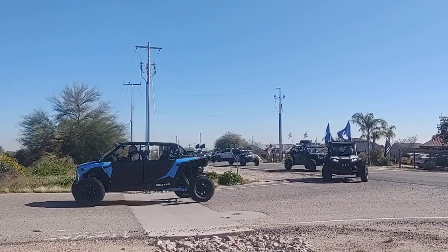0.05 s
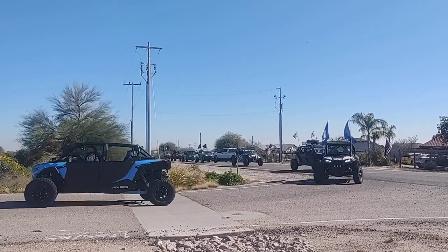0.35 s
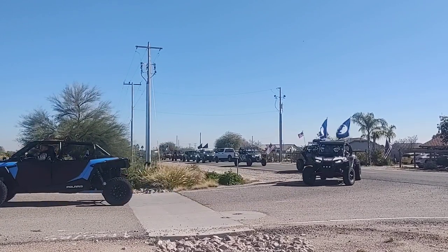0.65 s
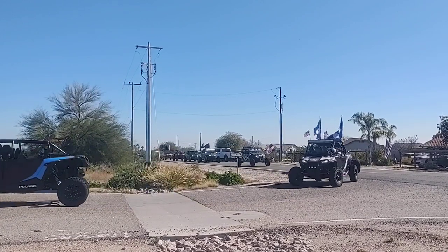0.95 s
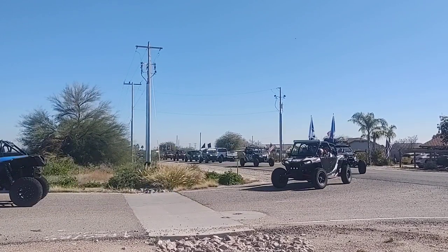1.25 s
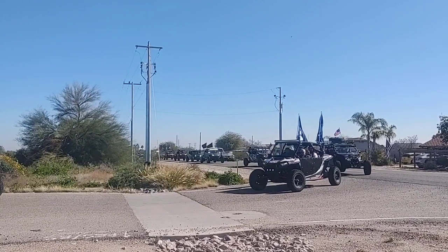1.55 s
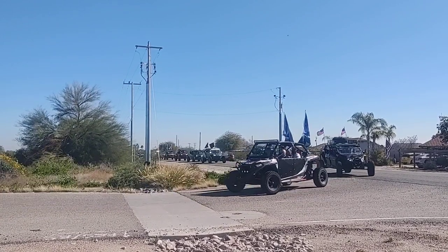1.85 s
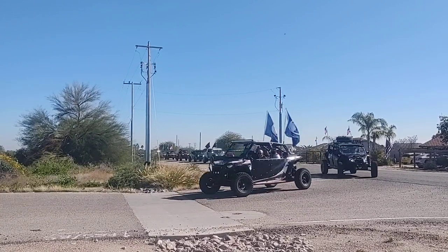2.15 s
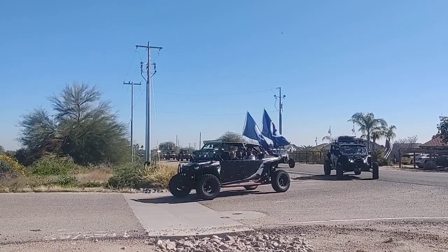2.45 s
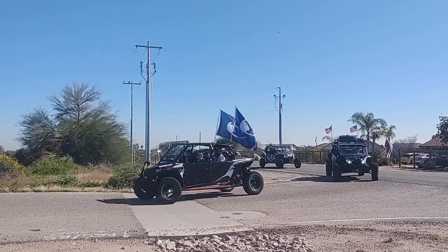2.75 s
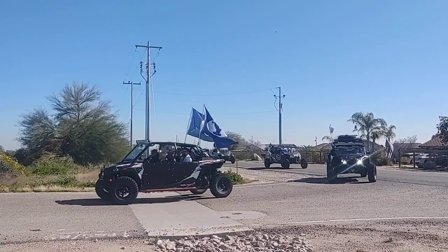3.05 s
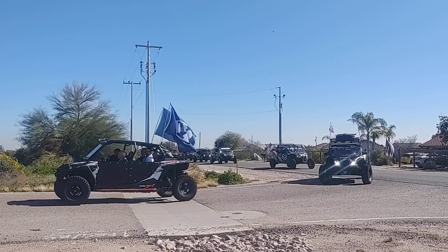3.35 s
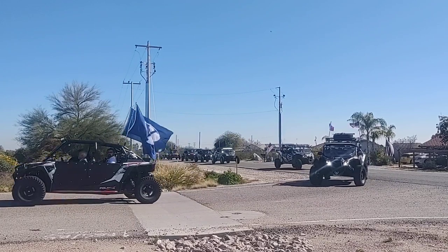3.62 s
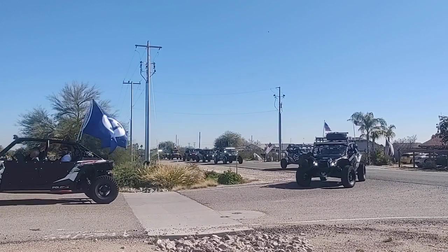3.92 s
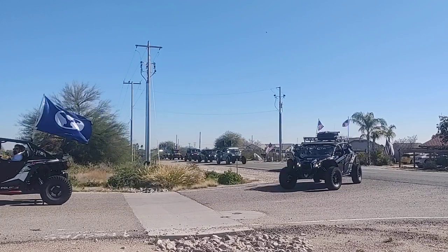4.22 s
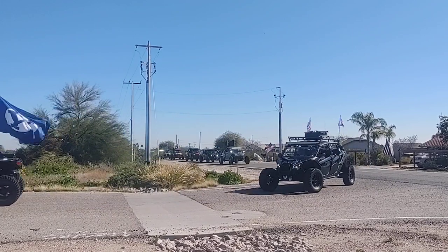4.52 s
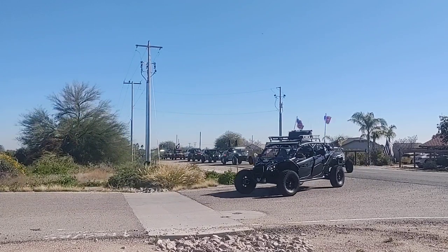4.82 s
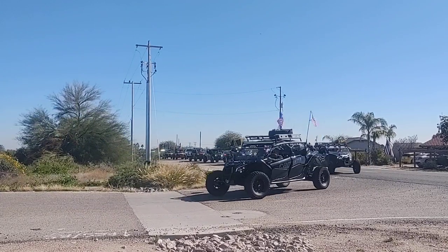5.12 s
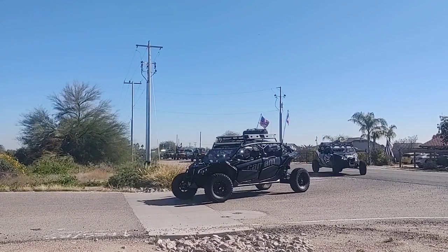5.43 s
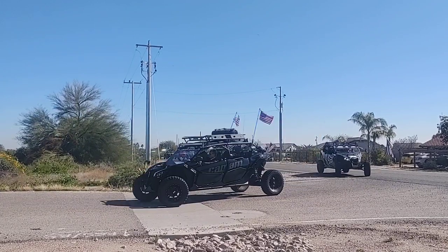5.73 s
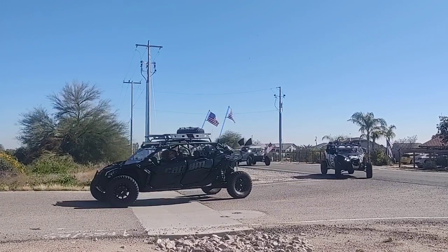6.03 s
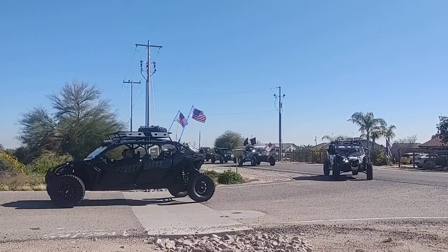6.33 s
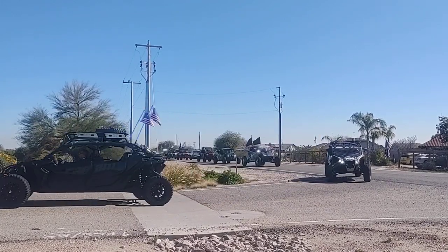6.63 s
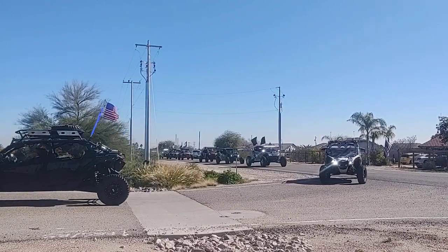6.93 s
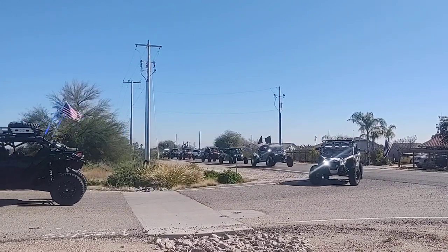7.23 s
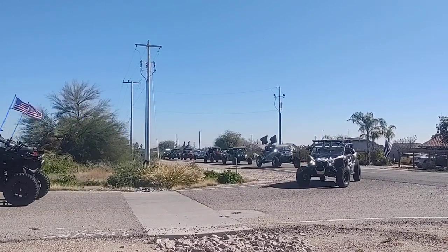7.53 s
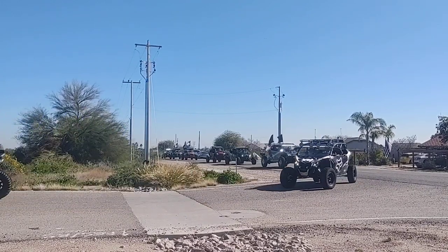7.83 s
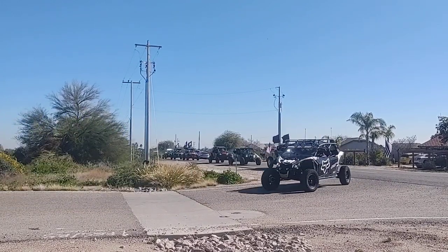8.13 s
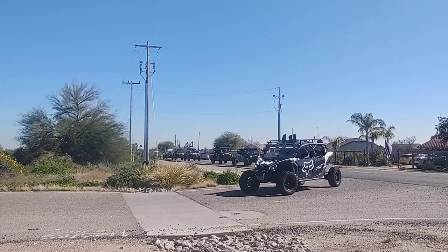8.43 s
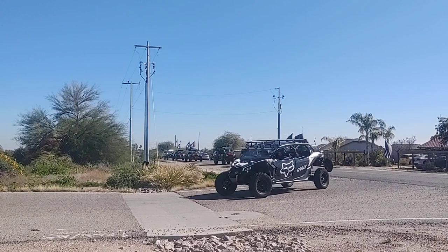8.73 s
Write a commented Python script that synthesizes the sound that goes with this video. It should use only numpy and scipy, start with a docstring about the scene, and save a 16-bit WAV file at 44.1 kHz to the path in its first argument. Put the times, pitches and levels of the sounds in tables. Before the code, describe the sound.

A line of off-road buggies crawls past on a street in the open air. Their uneven exhausts drone and beat against each other close by, over the low rumble of waiting engines. Tyres hiss and crunch on grit as each one passes, with light mechanical clatter. One engine blips midway; later a suspension squeaks twice and a buggy revs up from a muffled note into a snarl.

```python
"""Uneven twin-cylinder exhausts drone and beat as a column of off-road buggies crawls along a street.
Each firing rings a silencer; one buggy revs up and its muffled note opens into a snarl.
Intakes throb, drive belts whistle, valve gear clatters, tyres hiss and crunch on grit,
and a dry suspension bush squeaks twice. Behind it all rumbles the waiting queue, in the open air."""
import sys
import numpy as np
from scipy import signal
from scipy.fft import rfft, irfft, next_fast_len
from scipy.io import wavfile
from scipy.ndimage import uniform_filter1d

SR = 44100
rng = np.random.default_rng(int(sys.argv[2]) if len(sys.argv) > 2 else 0)


def dump(signal):
    """Clip the signal to [-1, 1] and save it as 16-bit WAV at the path in sys.argv[1]."""
    limited = np.clip(np.atleast_2d(signal).T, -1, 1)
    pcm = np.round(limited * 32767).astype(np.int16)
    wavfile.write(sys.argv[1], SR, pcm)


N = 395577
TIME = np.arange(N) / SR


def undb(db):
    """Decibels to gain."""
    return 10 ** (np.asarray(db) / 20)


def unit(x):
    """Scale to rms 1."""
    return x / np.sqrt(np.mean(x ** 2))


def curve(table):
    """A (time_s, value) automation lane, sample by sample."""
    return np.interp(TIME, *np.transpose(table))


def around(s, reach_s):
    """The samples near a moment."""
    return slice(max(int((s - reach_s) * SR), 0), int((s + reach_s) * SR))


def swell(s, half_s, steepness=2):
    """Rises to 1 at a moment and falls away again."""
    return np.exp(-np.minimum(np.abs((TIME - s) / half_s), 5) ** steepness)


def throttle(opens_s, attack_s, hold_s, release_s):
    """The pedal is pressed, held and let go."""
    return np.interp(TIME, opens_s + np.cumsum([0, attack_s, hold_s, release_s]), (0, 1, 1, 0))


def wander(rate_hz):
    """Smooth random modulation with a spread near 1."""
    steps = rng.standard_normal(2048)
    place = TIME * rate_hz
    k = place.astype(int)
    blend = .5 - .5 * np.cos(np.pi * (place - k))
    return steps[k % 2048] * (1 - blend) + steps[(k + 1) % 2048] * blend


def colour(x, points, size=4096):
    """Minimum-phase EQ through (freq_hz, gain_db) points, rolling off above the last."""
    hz, db = np.transpose(points)
    log_hz = np.log(np.maximum(hz, 1))
    grid = np.log(np.maximum(np.arange(size // 2 + 1) * SR / size, 1))
    beyond = np.maximum(grid - log_hz[-1], 0)
    cepstrum = irfft(np.log(undb(np.interp(grid, log_hz, db))) - 2 * beyond)
    cepstrum[1:size // 2] *= 2
    cepstrum[size // 2 + 1:] = 0
    response = irfft(np.exp(rfft(cepstrum)))
    return signal.oaconvolve(np.atleast_2d(x), response[None], axes=1)[:, :N]


def rings(modes, drive):
    """Noise or pulses ring a bank of (freq_hz, width_hz, level_db) resonances."""
    n = drive.shape[1]
    spectrum, out = rfft(drive, 2 * next_fast_len(n // 2 + 1)), 0
    grid = np.linspace(1, SR / 2, spectrum.shape[1])
    for hz, width, db in modes:
        detune = (grid / hz - hz / grid) * hz / width
        ringing = spectrum / (1 + .5j * detune) ** 2
        out += ringing * undb(db) / np.sqrt(np.mean(np.abs(ringing) ** 2) / n)
    return irfft(out)[:, :n]


def pan(x, lead_ms):
    """Pan by delay: a source on the left reaches the left side first."""
    return np.array([x, np.interp(TIME - lead_ms / 1000, TIME, x)])


# Direction of the nearest buggy: time_s, left_lead_ms
BEARING_PATH = [(0, 0.24), (.6, 0.33), (1.8, 0.45), (2.1, -.1), (2.8, -0.11), (3.2, 0.4), (4.4, 0.48),
                (5, -.11), (5.8, -0.0477), (6.5, 0.079), (7.1, 0.48), (8.97, 0.41)]


def air(focus, lead_ms=None):
    """Diffuse noise with a share, focus, from one direction: by default the nearest buggy's."""
    direct = pan(rng.standard_normal(N), curve(BEARING_PATH) if lead_ms is None else lead_ms)
    return np.sqrt(focus) * direct + np.sqrt(1 - focus) * rng.standard_normal((2, N))


def firings(cycle_hz, second_at, second_db, scatter_db):
    """A twin's second cylinder fires second_at of a cycle late; scatter shakes force and timing."""
    cycles = np.cumsum(cycle_hz) / SR + rng.random()
    pulses = np.zeros(N + 1)
    for offset, db in ((0, 0), (second_at, second_db)):
        force, timing = rng.standard_normal((1024, 2)).T
        due = np.arange(len(force)) + offset + .0008 * scatter_db * timing
        heard = (due > cycles[0]) & (due < cycles[-1])
        at = np.interp(due[heard], cycles, np.arange(N))
        k, strength = at.astype(int), undb(db + scatter_db * force[heard])
        np.add.at(pulses, k, strength * (1 - at + k))
        np.add.at(pulses, k + 1, strength * (at - k))
    return pulses[:N]


# Low bed of waiting engines: freq_hz, gain_db
QUEUE_EQ = [(20, -18), (40, -17.5), (62, -15.5), (88, -3.5), (120, 0.5), (150, 0), (190, -8.5), (280, -15),
            (380, -15.5), (600, -24), (1200, -53.5)]


def queue(level_db=-27, fade_db_per_s=0.14):
    """Four waiting engines drift in speed and merge into one lumpy rumble that thins as they leave."""
    pulses = 0
    for hz, lead_ms in ((24, -0.13), (31, -0.17), (32.5, 0.2), (44, 0.12)):
        pulses += pan(firings(hz * (1 + .025 * wander(1.2)), 0.399, -0.32, scatter_db=0.8), lead_ms)
    return unit(colour(pulses, QUEUE_EQ)) * undb(level_db - fade_db_per_s * TIME)


# Pass-bys in the near lane: nearest_s, engine_db, tyre_db
PASS_BYS = [(.2, -42.5, -45.5), (3.2, -37.5, -44.5), (5.6, -43.5, -50), (9.2, -41.5, -55)]


def passing(part, lag_s=0, falloff=1, speed_m_s=5.27, lane_m=6.14):
    """Summed gain of the passing buggies, each weakening with distance."""
    power = 0
    for s, engine_db, tyre_db in PASS_BYS:
        metres = np.hypot(lane_m, speed_m_s * (TIME - s - lag_s))
        db = {"engine": engine_db, "tyres": tyre_db}[part]
        power += (undb(db) * (lane_m / metres) ** falloff) ** 2
    return np.sqrt(power)


# Tread hiss: freq_hz, gain_db
TYRE_EQ = [(1500, -6.5), (3200, 3), (4400, -9.5), (5400, -1.5), (6400, 2.5), (7600, 0.5), (8700, 0.5),
           (10000, -0.5), (11500, -3.5), (13500, -5.5), (15500, -11)]


def tyres(trim_db=0.5, grit_db=1.2):
    """Tyres roll over fine grit with a grainy, flickering hiss."""
    grit = unit(undb(grit_db * rng.exponential(size=N // 32 + 1))).repeat(32)[:N]
    hiss = unit(colour(air(0.14) * grit, TYRE_EQ))
    return hiss * passing("tyres", falloff=1.58) * undb(trim_db + 0.85 * wander(25))


# Panel drone, intake breath and mechanical clatter: freq_hz, gain_db
PANEL_EQ = [(40, -23), (120, -15.5), (250, -5.5), (400, 2.5), (600, -0.5), (720, -12.5), (1100, -11),
            (2500, -50)]
INTAKE_EQ = [(400, -20.5), (700, 0.5), (900, 6.5), (1050, -11.5), (1300, -3), (2000, -37), (4000, -42)]
CLATTER_EQ = [(600, -22), (1200, -4.5), (1550, 3.5), (1850, 2), (2300, 3.5), (2750, -0.5), (3300, -10.5),
              (4500, -10.5), (8000, -26)]


def machinery(queue_panel_db=-40, queue_clatter_db=-47.5, flicker_db=1.0):
    """Panels drone, intakes gulp, valves and belts clatter, swelling above the queue at each pass."""
    bay = passing("engine")
    tail = passing("engine", lag_s=0.79)  # the open tail turns to us after the pass
    crank_turns = 2 * np.cumsum(curve(LEADER_REVS)) / SR
    beat = unit(1.8 + np.exp(-(crank_turns % 1) / 0.29))  # one accent a turn
    panels = unit(colour(air(0.42) * beat, PANEL_EQ)) * np.hypot(undb(queue_panel_db), tail * undb(-1))
    intake = unit(colour(air(0.042) * beat, INTAKE_EQ)) * tail * undb(-8)
    two_bays = air(0.42, lead_ms=-0.1) + 0.8 * air(0.48)  # the next in line and the nearest
    clatter = unit(colour(two_bays * beat, CLATTER_EQ)) * undb(flicker_db * wander(25))
    return panels + intake + clatter * np.hypot(undb(queue_clatter_db), bay * undb(-1))


# Thin belt tones: peak_s, half_length_s, pitch_hz, glide_hz_per_s, width_hz, level_db
BELT_TONES = [(1.5, 0.28, 10100, 0, 900, -60), (1.67, .14, 13650, 0, 200, -65),
              (2.08, .22, 8400, -500, 350, -55), (2.519, .14, 13710, 293, 200, -65),
              (3.122, .25, 6070, 298, 648, -54), (3.3, 0.27, 8770, -1500, 1309, -49.5)]


def belt_whistles():
    """Drive belts whistle in narrow, breathy tones, some sliding a little."""
    out = np.zeros((2, N))
    for s, half_s, hz, glide, width, db in BELT_TONES:
        span = around(s, 3 * half_s)
        age = TIME[span] - s
        carrier = np.exp(2j * np.pi * (hz * age + glide * age ** 2 / 2))
        for side, steps in zip(out, rng.standard_normal((2, 2, 4096))):
            flutter = np.interp((age - age[0]) * width, np.arange(4096), steps[0] + 1j * steps[1])
            side[span] += unit((flutter * carrier).real) * undb(db) * np.exp(-(age / half_s) ** 2)
    return out


# Single stones: peak_s, half_length_s, pitch_hz, width_hz, level_db
STONE_HITS = [(.945, .015, 1870, 1394, -55), (2.18, .0063, 1500, 600, -36), (5.51, .022, 4750, 500, -42),
              (5.71, .06, 4800, 400, -50), (5.652, .012, 13300, 1800, -47),
              (5.677, 0.0054, 10290, 1000, -45), (6.416, .006, 9900, 1816, -37),
              (6.492, 0.018, 2880, 790, -32), (6.635, 0.016, 6100, 1000, -41),
              (6.707, 0.015, 4360, 810, -40.5), (7.443, .008, 8650, 300, -59),
              (7.58, .006, 12950, 2500, -58), (7.858, 0.0083, 5020, 800, -47),
              (8.175, 0.011, 8770, 253, -47.5), (8.945, .007, 8830, 299, -54)]


def stones():
    """Stones ping against metal or scrape under the tread, each with one resonance."""
    out, scrape = np.zeros((2, N)), air(0.38)
    for s, half_s, hz, width, db in STONE_HITS:
        span = around(s, 4 * half_s)
        envelope = np.exp(-((TIME[span] - s) / half_s) ** 2)
        out[:, span] += rings([(hz, width, db)], scrape[:, span]) * envelope
    return out


# Stones crushed under a wheel: peak_s, level_db, spray_offset_db, decay_s
CRUNCH_HITS = [(.59, -39, -20, .02), (0.74, -37, -18, 0.016), (0.928, -33, -23, 0.015),
               (.948, -31.5, -23, .018), (1.585, -39, -22, .03), (1.70, -36, -14, .035),
               (2.015, -34, -34, 0.025), (2.048, -32.5, -30, .022), (2.143, -39, -27, .02),
               (2.181, -29, -28, .012), (2.198, -31, -28, .015), (2.256, -45, 4, .008),
               (2.331, -29, -11, 0.0049), (2.338, -30, -12, .02), (2.366, -25.5, -16, 0.012),
               (2.396, -34, -7, .012), (2.694, -44, 6, 0.0093), (2.814, -25, -20, 0.0062),
               (2.83, -43, -6, 0.0071), (2.885, -31, -20, 0.004), (2.955, -34, -22, .007),
               (3.48, -41, 1, .02), (4.598, -35, -15, .025), (4.74, -31.5, -12, 0.029),
               (4.922, -35, -14, .025), (5.075, -37, -16, 0.03), (5.31, -27, -20, 0.0051),
               (5.323, -32.5, -13, 0.032), (5.35, -31, -15, 0.022), (5.493, -23, -15, .02),
               (5.522, -27, -14, 0.016), (5.641, -28.5, -14, 0.0058), (5.652, -34, -11, 0.021),
               (5.675, -33, -8, 0.0084), (5.695, -30.5, -15, 0.013), (5.713, -34.5, -7.5, 0.028),
               (5.763, -39, -4, .015), (5.89, -39, -16, .03), (6.027, -33, -10, .014),
               (6.092, -37, -5, 0.016), (6.159, -36, -17.5, 0.032), (6.402, -52, 11, 0.0046),
               (6.414, -59, 18.5, 0.019), (6.481, -29.5, -2, 0.018), (6.496, -43.5, 0.5, 0.1),
               (6.532, -39, 1, 0.011), (6.562, -48, 7, 0.0053), (6.576, -44, 2, 0.008),
               (6.605, -38, -3, 0.0085), (6.623, -45, 7, 0.015), (6.642, -39, -6.5, 0.12),
               (6.663, -40, -18, 0.014), (7.771, -33.5, -17, 0.026), (7.831, -35, -20, .012),
               (8.16, -39, -18, 0.045), (8.64, -39, -24, 0.028), (8.762, -38.5, -30, 0.047),
               (8.904, -40, -22, 0.076)]
# Panel rattle and grit spray: freq_hz, gain_db
RATTLE_EQ = [(500, -24), (1100, -3), (1550, 5.5), (2380, 10.5), (2800, 0.5), (3500, -12.5), (4600, -7),
             (7000, -29)]
SPRAY_EQ = [(2000, -17), (4000, 8), (6500, 10), (10000, 6.5), (12500, 3), (15000, 0)]


def crunches(rattle_db=-2, spray_db=-3, attack_share=0.15):
    """Each crunch builds fast into small cracks that rattle the panels and spray bright grit."""
    rattle_gain, spray_gain = np.zeros((2, N))
    for s, db, spray_offset_db, decay_s in CRUNCH_HITS:
        span = around(s, 4 * decay_s)
        age = (TIME[span] - s) / decay_s
        envelope = undb(db) * np.exp(np.minimum(age, 0) / attack_share - np.maximum(age, 0) ** 2)
        rattle_gain[span] += envelope
        spray_gain[span] += envelope * undb(spray_offset_db)
    cracks = unit(undb(3 * wander(450)))
    sand = unit(undb(2.9 * wander(900)))
    rattle = unit(colour(air(0.84, lead_ms=-0.076) * cracks, RATTLE_EQ))
    spray = unit(colour(air(0.17, lead_ms=0) * sand, SPRAY_EQ))
    return rattle * rattle_gain * undb(rattle_db) + spray * spray_gain * undb(spray_db)


# Two bursts of suspension chirps: start_s, length_s, start_hz, end_hz, level_db, overtone_db
BUSH_CHIRPS = [(6.495, .049, 1072, 1130, -24.5, 1), (6.535, .052, 1120, 1110, -43, -8),
               (6.812, .052, 1090, 1090, -42, -12), (6.86, .066, 1092, 1140, -31, -4),
               (6.916, .04, 1120, 1105, -34, -17), (6.946, .06, 1105, 1098, -42, -20)]


def squeaks(overtone_ratio=1.94, flutter_db=2.0, grip_s=.008, slip_s=0.0097, bend=1.5):
    """A dry bush sticks and slips as a wheel drops; two of its modes sing roughly and bend."""
    out = np.zeros(N)
    wobble, flutter = 1 + .013 * wander(700), undb(flutter_db * wander(450))
    for s, length, start_hz, end_hz, db, overtone_db in BUSH_CHIRPS:
        on = (TIME > s) & (TIME < s + length)
        age = TIME[on] - s
        hz = start_hz + (end_hz - start_hz) * (age / length) ** bend
        phase = 2 * np.pi * np.cumsum(hz * wobble[on]) / SR
        tone = np.sin(phase) + undb(overtone_db) * np.sin(overtone_ratio * phase)
        envelope = np.minimum(np.minimum(age / grip_s, (length - age) / slip_s), 1)
        out[on] += undb(db) * np.sqrt(2) * envelope * flutter[on] * tone
    return pan(out, lead_ms=0.082)


# Resonances blown by rushing air: freq_hz, width_hz, level_db
INTAKE_MODES = [(1500, 300, -47.5), (2980, 480, -46.5)]
TAILPIPE_MODES = [(540, 35, -39)]
HOUSING_MODES = [(618, 36, -41), (918, 14, -48), (1538, 54, -41.5), (2400, 70.4, -61)]
THROTTLE_MODES = [(3600, 450, -45), (4670, 2300, -38), (8500, 5200, -67)]


def air_rush():
    """An intake, a tailpipe and a belt housing sing as they face us; a throttle hisses, then shuts."""
    rush = air(0.5)
    out = rings(INTAKE_MODES, rush) * swell(.15, half_s=0.92)
    out += rings(TAILPIPE_MODES, rush) * swell(8.3, half_s=.14)
    out += rings(HOUSING_MODES, rush) * swell(2.65, half_s=0.62)
    pedal = throttle(opens_s=3.62, attack_s=0.42, hold_s=.15, release_s=0.064)
    return out + rings(THROTTLE_MODES, rush) * pedal


# Airbox resonances, throbbing and gulping: freq_hz, width_hz, level_db
THROB_MODES = [(862, 49, -39), (1166, 33, -44.5)]
GULP_MODES = [(903, 28, -30.5), (1380, 370, -43), (1720, 440, -35.5), (2050, 79, -44), (2300, 55, -37.5)]


def airboxes():
    """Intake pulses ring the airboxes; one gulps air on a blip of the throttle."""
    lead_ms = curve(BEARING_PATH)
    throbs = pan(firings(curve(LEADER_REVS), 0.43, second_db=-0.5, scatter_db=2.5), lead_ms)
    late_throbs = pan(firings(curve(NEWCOMER_REVS), .4, second_db=-1, scatter_db=1), lead_ms)
    gulps = pan(firings(curve(BLIP_REVS), .375, second_db=1, scatter_db=0.5), lead_ms)
    breathy_gulps = unit(gulps) + undb(3.5) * air(0.5)
    throb_gain = swell(0.34, half_s=0.3, steepness=2.9) + undb(-5) * swell(8.25, half_s=0.15)
    out = rings(THROB_MODES, throbs) * throb_gain
    out += rings(THROB_MODES[:1], late_throbs) * undb(-3) * swell(8.92, half_s=0.12)
    return out + rings(GULP_MODES, breathy_gulps) * swell(4.03, half_s=0.23, steepness=2.5)


# Three-cylinder engine speed: time_s, cycle_hz
TRIPLE_REVS = [(7.2, 23.3), (7.6, 23.35), (7.9, 22.93), (8.3, 24.03), (8.7, 24.12), (8.97, 24.86)]
# Its silencer: freq_hz, gain_db
TRIPLE_EQ = [(70, -13), (140, -4), (215, 0.5), (285, 0), (350, -3), (430, -2), (560, -5.5), (750, -23),
             (1500, -44)]


def triple_exhaust(level_db=-36, scatter_db=5.5):
    """A three-cylinder buggy swells in near the end, firing evenly in time but unevenly in force."""
    fired = np.floor(np.cumsum(3 * curve(TRIPLE_REVS)) / SR)
    pulses = np.diff(fired, prepend=0) * undb(scatter_db * wander(140))
    note = unit(colour(pulses, TRIPLE_EQ)[0])
    return pan(note * undb(level_db) * swell(8.0, half_s=0.94, steepness=4), lead_ms=0.26)


# A silencer at open throttle, and heard straight down the pipe: freq_hz, gain_db
SNARL_EQ = [(45, -17.5), (95, 0), (140, 1.5), (185, 8.5), (235, 5.5), (285, -2), (335, -2.5), (380, 3),
            (430, 1), (475, -4.5), (530, 4.5), (620, -3.5), (720, -29), (1000, -25.5), (2000, -50)]
END_ON_EQ = [(50, -49), (93, -25), (125, 4.5), (155, 10), (186, 0.5), (215, 3.5), (247, -7.5), (277, -12),
             (308, -1.5), (340, -10), (400, -11.5), (432, -10), (463, -3), (495, -10), (527, -11.5),
             (556, -11), (590, -26), (650, -18), (720, -31), (880, -28), (1300, -61)]


def twin(revs, pipe, boom_db, bark_db, second_at, second_db, scatter_db, lead_ms, boom_db_per_hz=0,
         bark_db_per_hz=0, recede_db_per_s=0, split_hz=275, opens_hz=None, end_on=None, fade_s=0.074):
    """Firings ring a silencer; its low boom and upper bark each ride their own fader."""
    hz = uniform_filter1d(curve(revs), size=4000)  # the flywheel evens out every change
    (start_s, start_hz), end_s = revs[0], revs[-1][0]
    pulses = firings(hz, second_at, second_db, scatter_db)
    note = colour(pulses, pipe)[0]
    if opens_hz:  # the note opens into a snarl across this range of revs
        opening = np.interp(hz, opens_hz, (0, 1))
        note = (1 - opening) * note + opening * colour(pulses, SNARL_EQ)[0]
    if end_on is not None:
        note = (1 - end_on) * note + end_on * colour(pulses, END_ON_EQ)[0]
    boom = signal.sosfiltfilt(signal.butter(4, split_hz, fs=SR, output="sos"), note)
    boom_fader = boom_db + boom_db_per_hz * (hz - start_hz) - recede_db_per_s * (TIME - start_s)
    bark_fader = bark_db + bark_db_per_hz * (hz - start_hz)
    out = 0
    for band, db in ((boom, boom_fader), (note - boom, bark_fader)):
        running_rms = np.sqrt(uniform_filter1d(band ** 2, size=9000) + 1e-18)
        out += band / running_rms * undb(db)
    outside_s = np.maximum(start_s - TIME, TIME - end_s)
    return pan(out * np.clip(1 - outside_s / fade_s, 0, 1), lead_ms)


# Four-stroke engine speeds: time_s, cycle_hz
CRUISER_REVS = [(1.5, 47.2), (1.85, 48.07), (2.3, 46.6), (2.47, 48.4), (2.7, 47.1), (3.4, 49.88),
                (3.7, 47.83), (4.22, 48.76), (4.38, 47.62), (4.75, 47.08), (5.08, 46.85)]
STRAGGLER_REVS = [(6.75, 46.3), (7.2, 47.48), (7.6, 47.06), (8.2, 47.33), (8.6, 47.64), (8.76, 45.12),
                  (8.97, 47.27)]
# A silencer from afar: freq_hz, gain_db
DISTANT_EQ = [(45, -33), (95, 6.5), (145, 5), (240, -4.5), (330, -14), (385, 4.5), (470, -19.5), (620, -9),
              (800, -37), (1600, -50.5)]


def distant_twins():
    """Two twins hold high revs further off, barking louder while their pipes point at us."""
    cruiser = twin(CRUISER_REVS, DISTANT_EQ, boom_db=-26, bark_db=-37 + 6.5 * swell(4.47, half_s=0.8),
                   second_at=0.381, second_db=-3.5, scatter_db=2.5, lead_ms=0.36, recede_db_per_s=5)
    straggler = twin(STRAGGLER_REVS, DISTANT_EQ, boom_db=-37, bark_db=-39 + 5 * swell(8.95, half_s=0.21),
                     second_at=.378, second_db=-2.5, scatter_db=2, lead_ms=.3)
    return cruiser + straggler


# Engine speeds under a pressed pedal: time_s, cycle_hz
BLIP_REVS = [(3.78, 33.1), (3.95, 38.41), (4.1, 38.97), (4.22, 39.74)]
SNARL_REVS = [(6.38, 30.64), (6.69, 32.39), (6.87, 35.21), (7.17, 38.62), (7.4, 46.77), (7.52, 47.67),
              (7.79, 46.75), (7.9, 47.04), (8.08, 47.35), (8.41, 50.57), (8.52, 49.34), (8.65, 49.17),
              (8.79, 42.57), (8.97, 38.6)]
NEWCOMER_REVS = [(8.4, 25.88), (8.65, 27.04), (8.97, 29.52)]


def revving_twins(coasting_db=-6.5):
    """One twin blips, one opens up and softens as the pedal lifts, and a last one pulls in."""
    blip = twin(BLIP_REVS, SNARL_EQ, boom_db=-28.5, bark_db=-36,
                second_at=0.366, second_db=-2, scatter_db=4, lead_ms=0.36)
    lift_db = coasting_db * (1 - throttle(opens_s=6, attack_s=0.26, hold_s=2.396, release_s=0.065))
    snarl = twin(SNARL_REVS, MUFFLED_EQ, boom_db=-25.5 + lift_db / 2,
                 bark_db=-37 + 2.5 * swell(8.35, half_s=0.25) + lift_db,
                 second_at=0.3778, second_db=0, scatter_db=1.6, lead_ms=0.47,
                 bark_db_per_hz=0.6083, recede_db_per_s=2, opens_hz=(32, 43))
    newcomer = twin(NEWCOMER_REVS, MUFFLED_EQ, boom_db=-33.5, bark_db=-42, boom_db_per_hz=2.5,
                    second_at=0.45, second_db=-6, scatter_db=0.5, lead_ms=-0.14)
    return blip + snarl + newcomer


# Engine speeds of the front pair: time_s, cycle_hz
LEADER_REVS = [(0, 30.47), (.14, 30.5), (.34, 31.09), (.6, 30.95), (.93, 31.68), (1.25, 31.54),
               (1.5, 31.04), (2, 30.29), (2.5, 29.84), (2.8, 29.74), (3.15, 30.23), (3.47, 31.05),
               (3.75, 30.39), (4, 30.06), (4.38, 29.36), (4.6, 29.59), (5.08, 28.45), (5.42, 29.66),
               (5.7, 29.45), (5.9, 30.4), (6.3, 29.84)]
FOLLOWER_REVS = [(0, 29.92), (.35, 30.99), (.68, 30.44), (.9, 27.17), (1.35, 26.04), (2.12, 26.36),
                 (2.9, 29.39), (3.7, 26.47), (4.12, 25.62), (4.6, 26.2), (5.54, 25.71), (6.5, 23.34),
                 (8.1, 23.45), (8.97, 21.43)]
# Their silencers: freq_hz, gain_db
MUFFLED_EQ = [(50, -46.5), (93, -20.5), (125, 3), (155, 8.5), (190, -6), (215, -4.5), (245, -6.5),
              (275, -14.5), (310, -7), (345, -12), (390, -18.5), (480, -17), (560, -23), (650, -21),
              (720, -33), (880, -24), (1300, -68.5), (2500, -47)]
DEEP_EQ = [(50, -42.5), (80, -21.5), (108, 2), (135, -1.5), (165, -13.5), (230, -17.5), (320, -23.5),
           (450, -30.5), (620, -37), (900, -47.5), (2000, -63)]


def leading_twins():
    """Two close twins beat against each other and recede; their bark follows where the pipes point."""
    facing_db = swell(0.27, half_s=0.31) - 6.5 * swell(6.62, half_s=1.0)
    leader = twin(LEADER_REVS, MUFFLED_EQ, boom_db=-18.5, bark_db=-28.5 + facing_db,
                  second_at=0.3745, second_db=1, scatter_db=0.4, lead_ms=0.33, bark_db_per_hz=1.5,
                  recede_db_per_s=1.75, split_hz=191.6, end_on=swell(0.26, half_s=0.46, steepness=2.8))
    follower = twin(FOLLOWER_REVS, DEEP_EQ, boom_db=-24.5, bark_db=-38 + 8.5 * swell(0.32, half_s=0.44),
                    second_at=.425, second_db=-1.5, scatter_db=.5, lead_ms=0.48, recede_db_per_s=0.46)
    return leader + follower


def scene():
    """Exhausts up front, over the engine bays, the road noise and the queue."""
    exhausts = leading_twins() + distant_twins() + revving_twins() + triple_exhaust()
    engine_bays = machinery() + belt_whistles() + air_rush() + airboxes()
    road = tyres() + stones() + crunches() + squeaks()
    return exhausts + engine_bays + road + queue()


# Tonal tilt between the stereo sides: freq_hz, left_minus_right_db
SIDE_EQ = [(60, 0), (380, 0), (700, 0.5), (1290, -3.5), (2380, -2), (4400, 1), (7000, 3.5), (9500, -5.5),
           (12000, -4), (15000, 1)]


def record(dry, low_cut_hz=12, high_cut_hz=15700):
    """The microphone colours each side differently and cuts the deepest bass and the very top."""
    sides = np.array([colour(x, [(hz, sign * db / 2) for hz, db in SIDE_EQ])[0]
                      for x, sign in zip(dry, (1, -1))])
    sides = signal.sosfilt(signal.butter(1, low_cut_hz, "high", fs=SR, output="sos"), sides)
    return signal.sosfilt(signal.ellip(10, .2, 80, high_cut_hz, fs=SR, output="sos"), sides)


dry = scene()
out = record(dry)
dump(out)
```